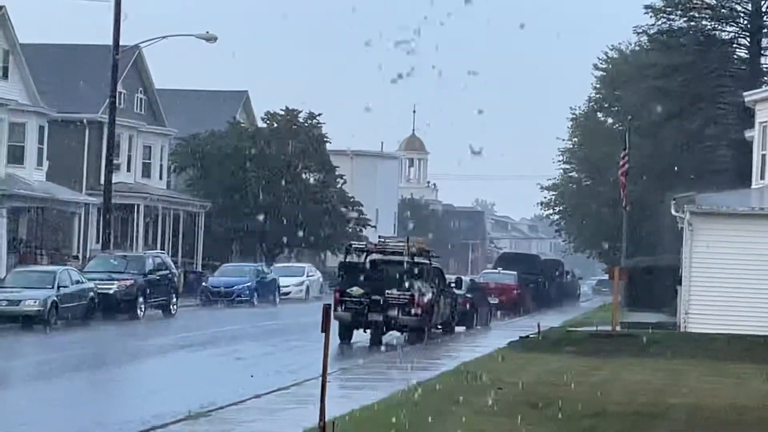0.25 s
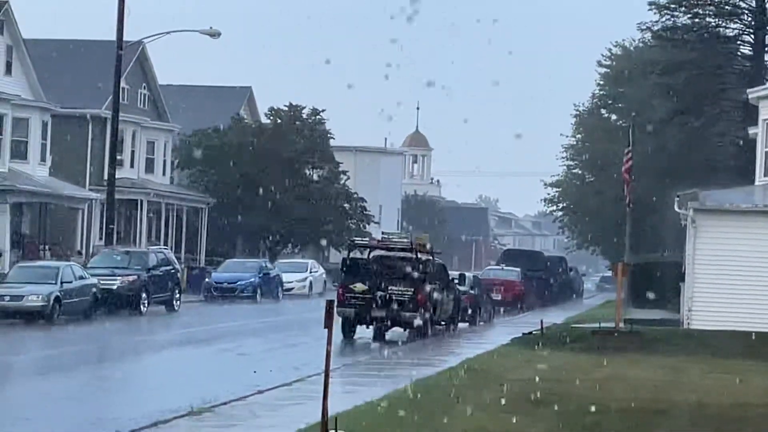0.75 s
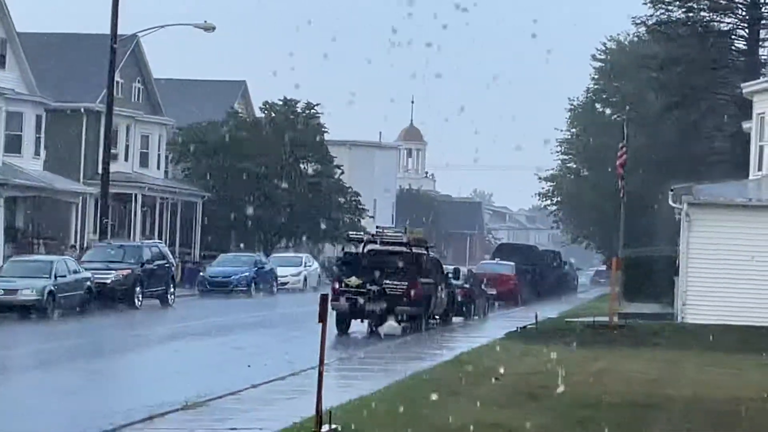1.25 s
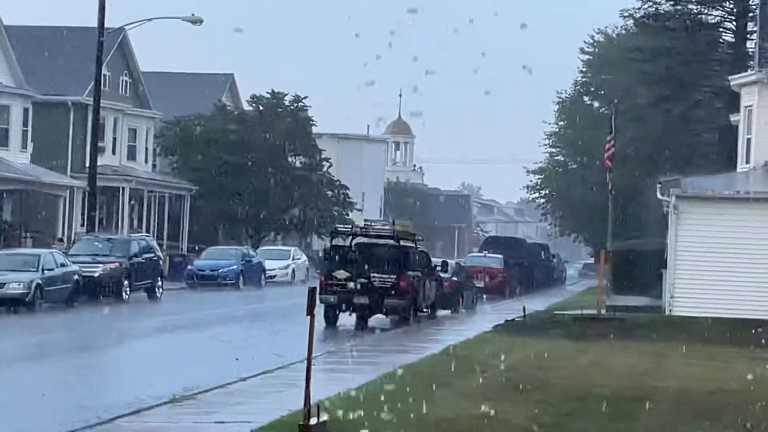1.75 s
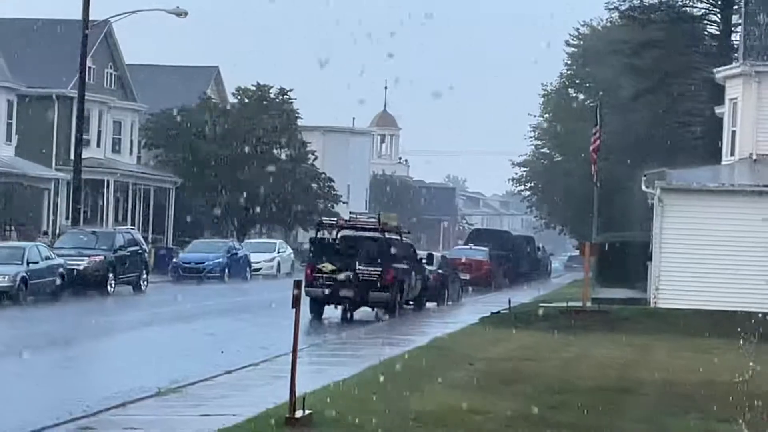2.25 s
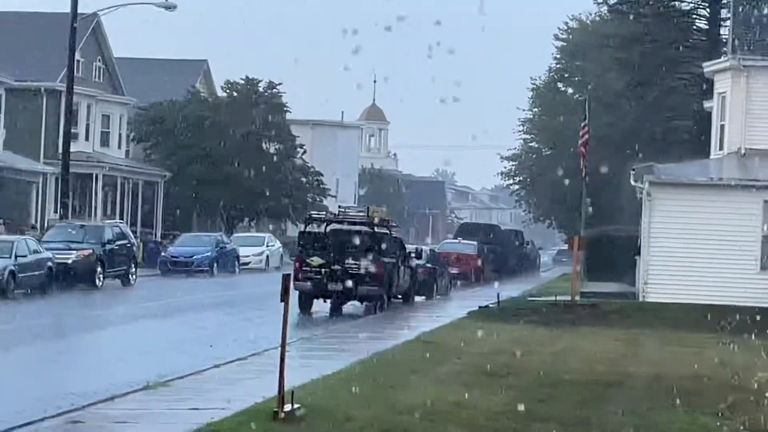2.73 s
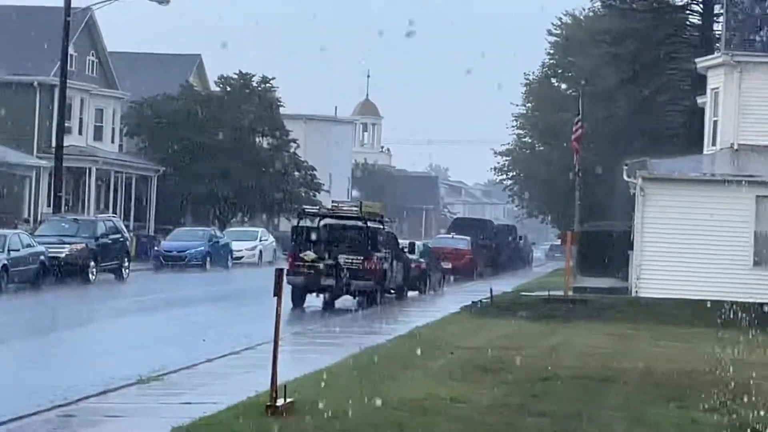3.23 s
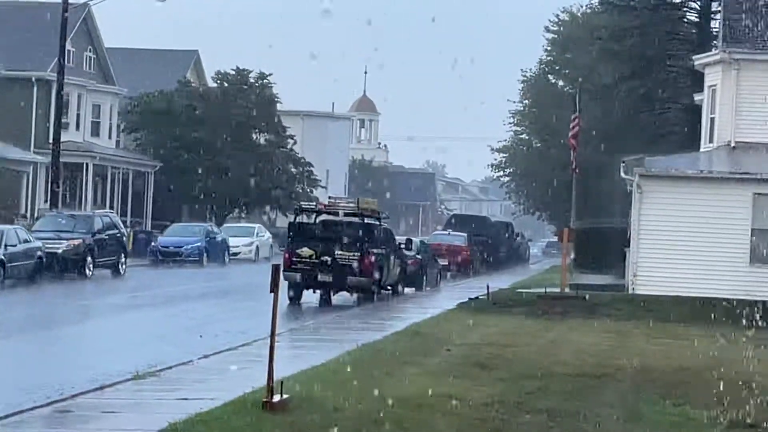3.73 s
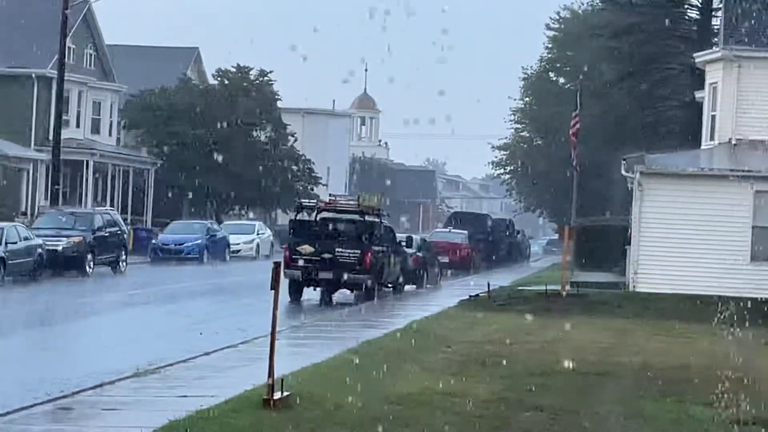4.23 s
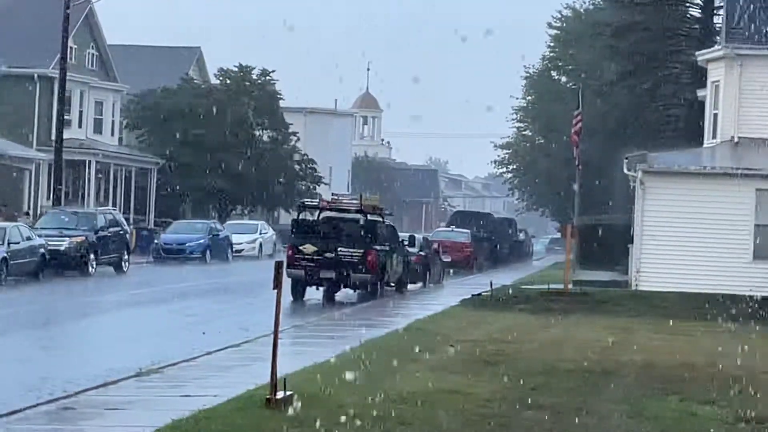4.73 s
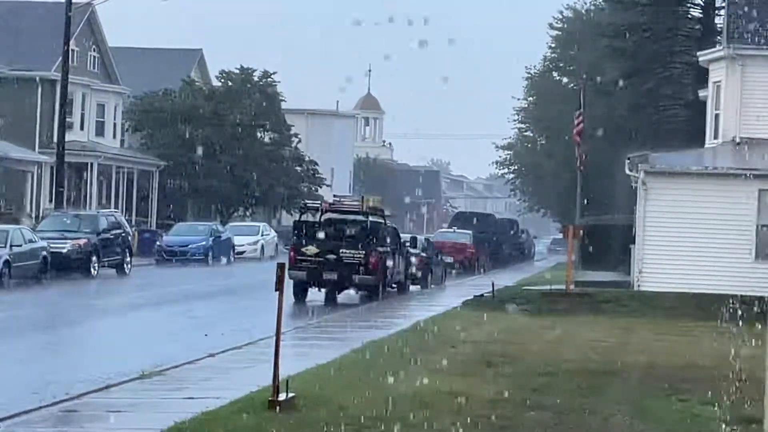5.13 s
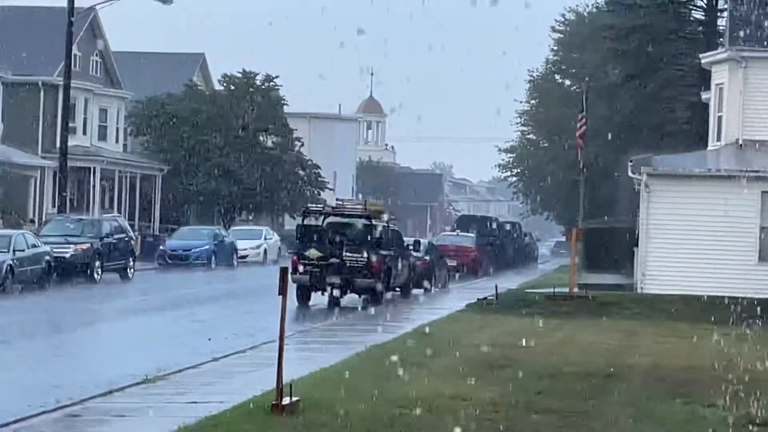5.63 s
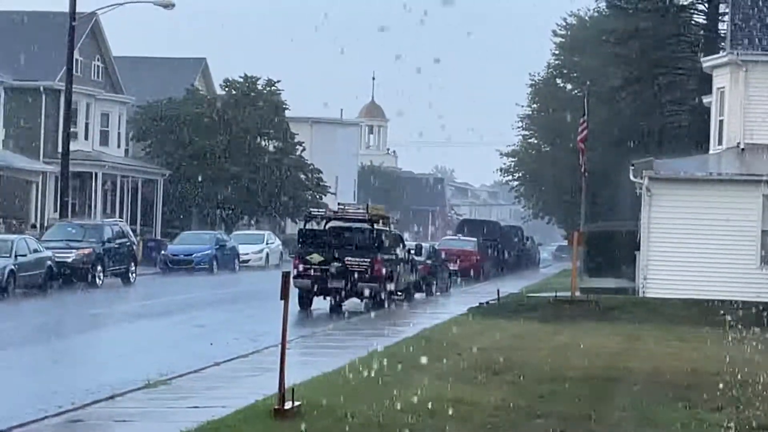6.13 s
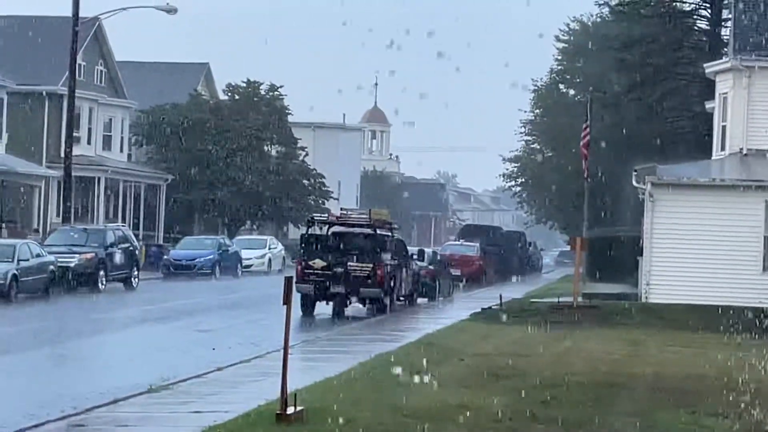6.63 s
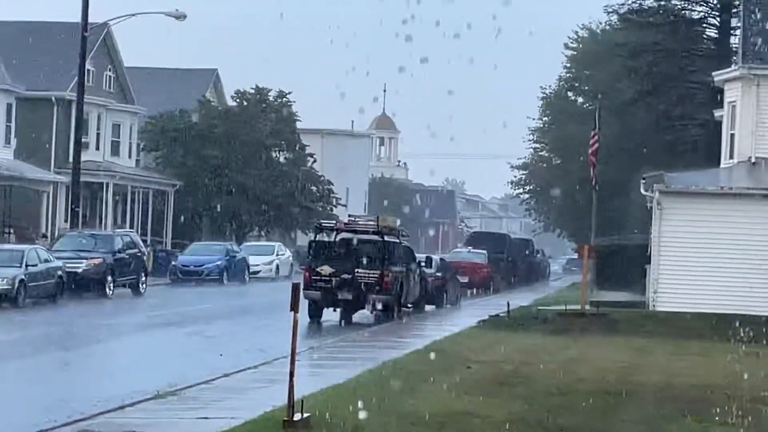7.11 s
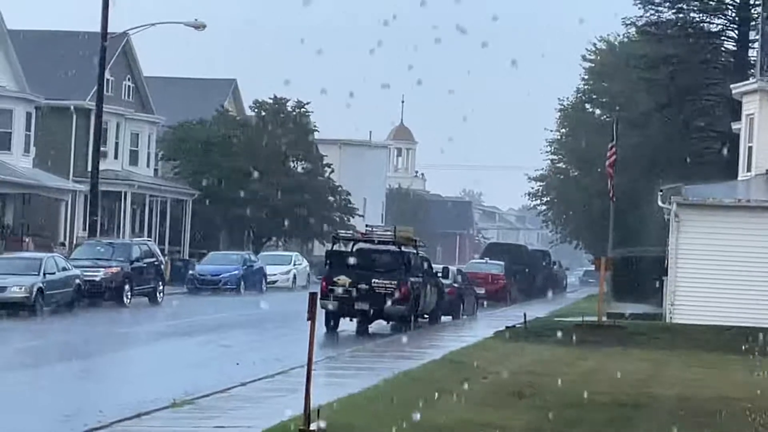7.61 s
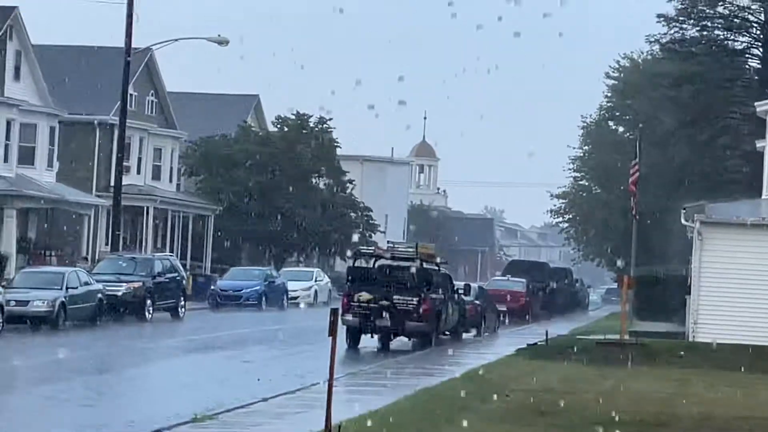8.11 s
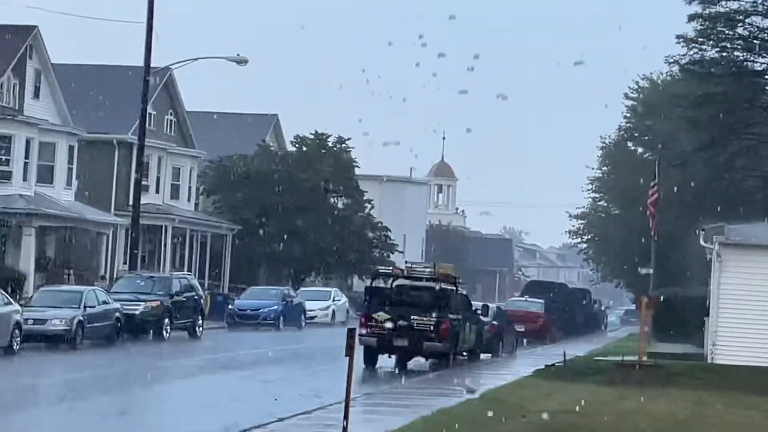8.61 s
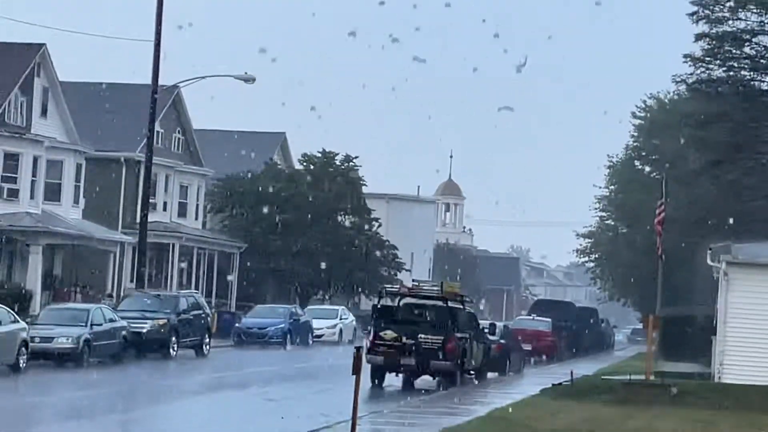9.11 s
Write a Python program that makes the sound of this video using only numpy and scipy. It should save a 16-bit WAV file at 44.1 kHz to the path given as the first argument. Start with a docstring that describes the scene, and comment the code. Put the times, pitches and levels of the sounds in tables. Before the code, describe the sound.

Heavy rain falls on a town street for the whole nine seconds or so, heard in stereo from a sheltered spot. Distant drops merge into an even hiss, nearer ones patter densely, and large close drops tick and smack irregularly on hard ground, with a very short reflection from house walls. A low rumble of far traffic lies underneath, slowly receding. From the start, a faint distant engine hums and climbs in pitch as it pulls away, dips with a gear change at about 4 seconds, rises a little again and fades by about 5.5 seconds. Soft low bumps and a dull knock come within the first 0.7 seconds, and another dull knock at about 7.4 seconds. The strongest close drops land around 2 and 3.4 seconds. The rain swells slightly near 5.6 seconds, then continues steadily to the end.

```python
"""Heavy rain on a town street, heard from shelter through two close microphone ports.
Countless far drops merge into a wash, nearer ones patter, and the nearest tick on hard ground,
each a smack with a brief ring. House walls scatter the nearer drops and a few dull knocks.
Far off, an engine's exhaust tones climb as it pulls away over the low rumble of the town."""
import sys
import numpy as np
from scipy import signal
from scipy.fft import rfft, irfft
from scipy.io import wavfile
from scipy.ndimage import uniform_filter1d

SR = 44100
rng = np.random.default_rng(int(sys.argv[2]) if len(sys.argv) > 2 else 0)


def wav_out(sig):
    """Save sig, one row per channel (or a flat mono array), as 16-bit PCM at SR to the path in sys.argv[1]."""
    wavfile.write(sys.argv[1], SR, np.round(np.clip(np.atleast_2d(sig).T, -1, 1) * 32767).astype(np.int16))


N = 412776
BAND_LIMIT_HZ = 15850
PRE_IMPACT_S = .006


def gain_of(db):
    """Decibels to amplitude."""
    return 10 ** (np.asarray(db) / 20)


def unit_rms(x):
    """Scales to rms 1."""
    return x / np.sqrt(np.mean(x ** 2) + 1e-20)


def at_hz(table, hz):
    """Interpolates a table over log frequency."""
    table_hz, value = np.transpose(table)
    return np.interp(np.log(hz + 1), np.log(table_hz + 1), value)


def add(mix, start_s, sound):
    """Mixes a sound in at start_s."""
    part = mix[max(round(start_s * SR), 0):][:len(sound)]
    part += sound[:len(part)]


# Likeness of far sound at the two ports: (frequency [Hz], coherence [0-1])
COHERENCE = [(50, 0.95), (130, 0.98), (260, 0.77), (500, 0.39), (900, 0.42), (1400, 0.23), (1800, 0.1),
             (2100, 0.56), (2600, 0.82), (3000, 1), (5300, 1), (6500, 1), (16000, 1)]
def diffuse(spectrum):
    """Noise from all around, partly alike at the two ports."""
    hz = np.fft.rfftfreq(N, 1 / SR)
    left, independent = rfft(rng.standard_normal((2, N)))
    coherence = np.clip(at_hz(COHERENCE, hz), 0, 1)
    right = coherence * left + np.sqrt(1 - coherence ** 2) * independent
    return irfft(np.array([left, right]) * gain_of(at_hz(spectrum, hz)) * np.sqrt(SR / 2), N)


# Far rain: (frequency [Hz], density [dB/Hz])
WASH_SPECTRUM = [(60, -90), (200, -73.5), (400, -69.5), (700, -70), (1200, -72.5), (1600, -72.5),
                 (1900, -71), (2400, -73.5), (3400, -78), (5300, -76.5), (8000, -77.5), (10000, -79.5),
                 (13000, -86.5), (15500, -82)]
def wash(patchy_db=1.98, flicker_db=0.7):
    """Far drops merge into a hiss that thickens and thins in patches."""
    hz, t, bands = signal.stft(diffuse(WASH_SPECTRUM), SR, nperseg=512)
    patches = uniform_filter1d(rng.standard_normal(bands.shape[1:]), size=5, axis=1)
    patches = unit_rms(uniform_filter1d(patches, size=9, axis=0))
    flicker = unit_rms(uniform_filter1d(rng.standard_normal(len(t)), size=7))
    nearness = np.clip(hz / 3500, 0.56, 1)[:, None]  # lows come from farther off: smoother
    level_db = nearness * (patchy_db * patches + flicker_db * flicker)
    return signal.istft(bands * gain_of(level_db), SR, nperseg=512)[1][:, :N]


def smack(low_hz, high_hz, crack_db, ground_hz=4000, ground_db=1.0, size=512):
    """One impact pulse: a broad band from hard ground plus a crack as the drop bursts."""
    hz = np.fft.rfftfreq(size, 1 / SR) + 1
    body = 1 / np.sqrt((1 + (low_hz / hz) ** 12) * (1 + (hz / high_hz) ** 12))
    body *= gain_of(ground_db * np.exp(-(2 * np.log2(hz / ground_hz)) ** 2))
    crack = gain_of(crack_db) / np.sqrt((1 + (4000 / hz) ** 4) * (1 + (hz / 10800) ** 10))
    pulse = np.fft.fftshift(np.fft.ifft(np.hypot(body, crack), size))
    return (pulse / abs(pulse).max() * np.exp(2j * np.pi * rng.random())).real


def drop(low_hz, high_hz, ring_hz, crack_db, echo_db, spray_db,
         ring_q=6.7, echo_s=.0024, droplets=5, droplet_gain=0.078, droplet_delay_s=.03):
    """A drop hits amid spray, flattens and rings; a rough surface echoes it and droplets fall."""
    lead, tail = round(PRE_IMPACT_S * SR), SR // 10
    t = np.arange(-lead, tail) / SR
    echo_at_s = echo_s * (1 + (2 * rng.random() - 1) / 10)
    blows = 1. * (t == 0)
    for db, peak_s, rise_s, decay_s in ((spray_db - 2, 0, .000285, .00057),  # flattening
                                        (spray_db, 0, .0017, .0057),  # spray
                                        (echo_db, echo_at_s, .000086, .00086)):
        age_s = t - peak_s
        envelope = np.exp(np.minimum(age_s / rise_s, -age_s / decay_s)) * (abs(t) > .0002)
        burst = rng.standard_normal(len(t)) * envelope
        blows += gain_of(db) * burst / np.linalg.norm(burst)
    landings = (rng.exponential(droplet_delay_s, droplets) * SR).astype(int) % tail
    blows[lead + landings] += droplet_gain * rng.standard_normal(droplets)
    tick = signal.fftconvolve(blows, smack(low_hz, high_hz, crack_db), "same")
    ring = signal.lfilter(*signal.iirpeak(min(ring_hz, BAND_LIMIT_HZ), ring_q, fs=SR), tick)
    return tick + ring


def patter(level_db=-35, drops_per_s=440, spread_db=5, largest_db=12.0, clumping=.5, spot_count=96):
    """Mid-distance drops land in clumps on many spots, each with its own colour; few are large."""
    spots = []
    for pitch, breadth, crack in rng.standard_normal((spot_count, 3)):
        low_hz = 3100 * np.exp(.35 * pitch)
        high_hz = low_hz * 1.98 * np.exp(0.27 * breadth)
        ring_hz = low_hz * (high_hz / low_hz) ** rng.random()
        spots.append(drop(low_hz, high_hz, ring_hz, crack_db=-7 + 3.5 * crack, echo_db=-10, spray_db=-8))
    density = np.exp(clumping * rng.standard_normal(N * 40 // SR))  # 25 ms slots
    fallen = np.r_[0, np.cumsum(density)]
    when, where, size = rng.random((int(drops_per_s * N / SR), 3)).T
    times_s = np.interp(when, fallen / fallen[-1], np.linspace(0, N / SR, len(fallen)))
    sizes_db = np.minimum(-spread_db * np.log(1 - size), largest_db)
    out = np.zeros(N)
    for time_s, spot, db in zip(times_s, (where * spot_count).astype(int), sizes_db):
        add(out, time_s, gain_of(db) * spots[spot])
    return gain_of(level_db) * out


def walls(x, wet_db=-12.0, t60_s=0.2, delay_s=.004):
    """House walls throw back a brief scatter."""
    t = np.arange(SR // 4) / SR
    tail = rng.standard_normal(len(t)) * gain_of(-60 * t / t60_s) * (t > delay_s)
    scatter = signal.oaconvolve(np.atleast_2d(x), tail[None] / np.linalg.norm(tail), axes=1)
    return x + gain_of(wet_db) * scatter[:, :N]


def rain_strength(level_db=-0.07, sway_db=0.22, gust_at_s=5.58, gust_width_s=0.37, gust_db=0.9):
    """The rain sways a little by chance and rises in one gust."""
    t = np.arange(N) / SR
    sway = sum(np.sin(2 * np.pi * (hz * t + rng.random())) for hz in np.geomspace(0.26, 1.262, 8))
    gust = np.exp(-((t - gust_at_s) / gust_width_s) ** 2)
    return gain_of(level_db + sway_db * unit_rms(sway) + gust_db * gust)


# Town rumble: (frequency [Hz], density [dB/Hz])
RUMBLE_SPECTRUM = [(10, -95), (22, -88), (32, -74), (45, -71), (60, -59.5), (76, -61.5), (92, -62.5),
                   (122, -65), (165, -66.5), (250, -68.5), (450, -78), (1200, -87.5), (4000, -130)]
# Far traffic swells: (time [s], half-width [s], centre [Hz], rise [dB])
TRAFFIC_SWELLS = [(.2, .45, 62, 3), (3.2, 0.67, 417, 7.5), (5.2, 0.81, 139.9, 1.5), (5.503, 0.14, 264, 6),
                  (6.005, 2.2, 245, 2)]
def traffic(start_db=0.42, fade_db_per_s=0.17, swell_octaves=0.27):
    """The town's low rumble slowly recedes, with a few swells of far traffic."""
    hz, t, bands = signal.stft(diffuse(RUMBLE_SPECTRUM), SR, nperseg=4096)
    level_db = start_db - fade_db_per_s * t
    for time_s, width_s, centre_hz, rise_db in TRAFFIC_SWELLS:
        band = np.exp(-(np.log2((hz + 1) / centre_hz) / swell_octaves) ** 2)
        swell = np.exp(-((t - time_s) / width_s) ** 2)
        level_db = level_db + rise_db * np.outer(band, swell)
    return signal.istft(bands * gain_of(level_db), SR, nperseg=4096)[1][:, :N]


# Pull, gear change, pull: (time [s], firing rate [Hz], firing tone [dB], octave [dB])
ENGINE_RUN = [(0, 50.86, -47, -50), (.7, 51.8, -43, -51), (1.0, 54.9, -46, -39.5), (1.22, 56.2, -56, -39),
              (1.4, 59.35, -45, -45), (1.6, 59.5, -43, -44.5), (1.85, 59.7, -45, -44.5),
              (2.0, 62.85, -43, -68), (2.3, 68.2, -43.5, -58), (2.6, 74.5, -50, -54.5),
              (3.08, 76, -44, -43), (3.32, 77.6, -49, -62), (3.7, 80, -59, -70), (4.15, 69.9, -54, -49),
              (4.45, 69.8, -49, -48.5), (4.85, 74.2, -50, -50.5), (5.45, 74.5, -64, -49)]
# Weaker exhaust tones: (order [x firing rate], level [dB re firing tone])
WEAK_ORDERS = [(1.5, -18.5), (5, -20)]
# Exhaust pipe resonances: (centre [Hz], width [Hz], boost [dB])
PIPE_MODES = [(108.6, 14, 16.5), (375, 13, 15)]
def engine(fade_s=0.2, flutter_db=2):
    """Far exhaust tones climb with speed; the weaker ones sing as they cross a pipe resonance."""
    t = np.arange(N) / SR
    times_s, *curves = np.transpose(ENGINE_RUN)
    firing_hz, firing_db, octave_db = (np.interp(t, times_s, curve) for curve in curves)
    phase = 2 * np.pi * np.cumsum(firing_hz) / SR
    tones = gain_of(firing_db) * np.sin(phase) + gain_of(octave_db) * np.sin(2 * phase)
    for order, db in WEAK_ORDERS:
        boost_db = sum(peak_db / (1 + (2 * (order * firing_hz - centre_hz) / width_hz) ** 2)
                       for centre_hz, width_hz, peak_db in PIPE_MODES)
        tones += gain_of(firing_db + db + boost_db) * np.sin(order * phase)
    uneven_firing = unit_rms(uniform_filter1d(rng.standard_normal(N), size=2500))
    fade = np.exp(-np.maximum(t - times_s[-1], 0) / fade_s)
    return np.sqrt(2) * tones * gain_of(flutter_db * uneven_firing) * fade


# Dull knocks and soft bumps: (time [s], level [dB], ring [Hz], decay [cycles])
KNOCK_HITS = [(.066, -27.5, 80, 1.6), (0.555, -25, 99, 2.3), (0.6668, -20.5, 1460, 2.5),
              (0.6675, -27, 1780, 6), (0.6714, -32, 1300, 6.5), (7.4306, -18, 970, 1.1),
              (7.4307, -28, 1970, 5), (7.4343, -27, 780, 1.8)]
def knocks():
    """Dull blows ring as quickly damped tones."""
    out, t = np.zeros(N), np.arange(SR // 8) / SR
    for time_s, db, hz, cycles in KNOCK_HITS:
        add(out, time_s, gain_of(db) * np.sin(2 * np.pi * hz * t) * np.exp(-hz * t / cycles))
    return out


def from_side(x, lead_s):
    """One sound at both ports, reaching the left lead_s sooner."""
    left = np.exp(1j * np.pi * np.fft.rfftfreq(len(x), 1 / SR) * lead_s)
    return irfft(rfft(x) * np.array([left, 1 / left]), len(x))


# Nearest drops: (time [s], level [dB], smack low edge [Hz], smack high edge [Hz], wet ring [Hz],
# crack [dB re smack], close echo [dB re direct])
NEAR_DROPS = [(0.2888, -23.5, 3700, 6000, 5400, -7, -4), (0.3001, -26.0, 2700, 11000, 9600, -24, -15),
              (0.3528, -29.5, 2300, 11000, 8400, -24, -12), (0.7254, -34, 1800, 4300, 2400, -18, -5),
              (1.0116, -26, 3700, 7000, 4000, -5, -17), (1.057, -30, 3700, 7000, 5200, -24, -8),
              (1.281, -27, 1600, 5000, 4200, -7, -9), (1.3365, -24, 2700, 6000, 4400, -18, -4),
              (1.5859, -29, 2700, 4000, 4000, -11, 0), (1.6196, -29.5, 2720, 5000, 4640, -7, -4),
              (1.7387, -27.5, 1599, 8450, 8400, -18, -1), (1.858, -33, 3200, 6400, 3500, -18, -6),
              (1.894, -18, 2080, 5700, 4830, -13, -12), (1.9647, -28.5, 1600, 6970, 2600, -24, 1),
              (1.9773, -31.5, 2300, 7000, 2400, -13, -3), (2.0683, -26, 1900, 8500, 4200, -24, 0),
              (2.0889, -19, 1910, 8540, 3600, -2, -15), (2.1041, -21.5, 1600, 8500, 4000, -7, -4),
              (2.1098, -31.5, 2710, 4500, 4200, -7, 1), (2.1288, -31.5, 1600, 5500, 2800, -9, -3),
              (2.2768, -27.5, 1600, 6000, 2610, -7, -2), (2.321, -31.5, 2300, 8560, 4200, -11, -15),
              (2.369, -31.5, 2700, 5500, 5400, -24, -10), (2.4456, -31.0, 2300, 8500, 2800, -13, -6),
              (2.5155, -26, 2700, 11000, 4200, -24, -12), (2.7084, -31, 1890, 6000, 5950, -18, -9),
              (2.8356, -29.5, 4000, 6800, 5600, -18, 0), (2.863, -26.5, 2300, 14000, 4400, -3, 2),
              (2.9438, -25.5, 1900, 4500, 2700, -18, -2), (2.9487, -26.5, 2700, 5500, 4000, -11, -6),
              (3.1741, -27.5, 3700, 5000, 5000, -4, -15), (3.2721, -30.5, 1910, 4510, 3210, -13, -4),
              (3.2982, -28, 2700, 7000, 3000, -4, 0), (3.3793, -28.0, 4300, 6000, 5600, -8, 0),
              (3.406, -20.5, 3700, 6000, 4900, -5, -21), (3.5713, -35, 10000, 15000, 11000, -12, -14),
              (3.6025, -32, 3700, 8500, 3800, -7, -15), (3.7104, -29, 5000, 7020, 5370, -3, -4),
              (3.8073, -28, 1900, 5500, 5200, -11, 3), (3.9116, -29.5, 4300, 14000, 10800, -11, 0),
              (4.0473, -28, 3690, 14000, 4000, -3, -2), (4.2908, -28.5, 3700, 8500, 4014, -5, -2),
              (4.3358, -29, 1900, 5000, 3000, -6, -10), (4.4777, -23, 2710, 7000, 5040, -18, -1),
              (4.5457, -28, 3700, 6000, 4400, -4, -4), (4.5582, -30, 3200, 4500, 4400, -5, -15),
              (4.6054, -29.5, 2300, 11000, 4600, -24, -13), (4.6263, -32, 2500, 5000, 4000, -18, -8),
              (4.8222, -23.5, 2700, 11000, 6800, -7, -15), (4.856, -27.5, 2300, 4010, 2397, -5, -4),
              (4.8832, -31, 1600, 4500, 2600, -5, 4), (4.9002, -29.5, 1600, 8500, 4600, -13, -15),
              (4.9301, -29.0, 3700, 14000, 5000, -3, -5), (4.9866, -31, 3700, 5000, 4800, -5, -10),
              (5.0488, -30, 1900, 4000, 2800, -11, -2), (5.0609, -27.0, 1600, 5540, 2600, -1, 3),
              (5.1685, -28, 3200, 8500, 8400, -18, -3), (5.1777, -29, 1900, 8500, 4200, -9, 0),
              (5.1853, -28, 1900, 11000, 2600, -24, -2), (5.2316, -28, 1900, 8500, 4000, -7, 2),
              (5.3103, -29, 1587, 8500, 3600, -13, -6), (5.4034, -26.5, 5060, 11000, 9800, -7, -9),
              (5.462, -32, 4300, 8500, 8400, -11, -1), (5.7152, -25.5, 3200, 14000, 4200, -3, -2),
              (5.7709, -27.5, 1910, 5500, 4000, -9, -6), (5.9383, -29.0, 4300, 6040, 6000, -9, -9),
              (5.9452, -29.5, 2300, 6000, 5400, -13, -5), (6.376, -29, 5000, 8500, 6800, -11, -7),
              (6.3933, -23.5, 1900, 14000, 10400, -24, 1), (6.4327, -31, 3200, 5500, 4200, -3, -11),
              (6.7543, -34, 3000, 4500, 3600, -18, -6), (6.7677, -29, 2700, 6000, 3000, -1, -8),
              (6.8108, -27.0, 2700, 8500, 8400, -9, -2), (6.9383, -23, 3500, 5600, 4700, -6, -6),
              (7.0153, -27.5, 2300, 11000, 10600, -24, 0), (7.1002, -30, 2300, 5500, 5400, -3, -4),
              (7.1052, -29.0, 3700, 7000, 5600, -11, -1), (7.206, -28.5, 1600, 8500, 8400, -13, 4),
              (7.2722, -29.0, 3700, 11000, 10800, -24, -3), (7.2992, -26, 1900, 6000, 5400, -4, -4),
              (7.3964, -24.0, 1900, 7000, 4200, -11, -11), (7.4249, -29.0, 1600, 7000, 3200, -11, -2),
              (7.4346, -29.0, 1600, 5000, 4000, -11, -1), (7.5121, -29, 3700, 11000, 4600, -24, 0),
              (7.5536, -31.5, 2700, 6000, 5200, -11, -5), (7.631, -32, 2300, 4500, 4200, -11, -15),
              (7.677, -25, 3700, 11000, 5200, -24, -14), (7.776, -24.5, 1900, 4800, 2800, -4, -14),
              (7.8749, -34, 3300, 6300, 3700, -18, -6), (7.9314, -32, 1600, 5000, 2420, -18, -3),
              (8.0482, -29.5, 3200, 5000, 4800, -4, -15), (8.1779, -33, 2300, 6000, 5600, -11, -3),
              (8.2667, -32.5, 2300, 4500, 4000, -7, -5), (8.275, -27.5, 1600, 6000, 5800, -1, -2),
              (8.3353, -28.5, 1800, 4300, 2500, -12, -1), (8.4285, -35, 3700, 8500, 4400, -11, -5),
              (8.5363, -34, 3700, 5000, 4200, -7, -15), (8.5453, -32, 3700, 11000, 5400, -24, -3),
              (8.586, -31.0, 2300, 5000, 4800, -16, -9), (8.6006, -32.0, 3700, 5000, 4400, -7, -15),
              (8.6696, -29, 2300, 7000, 4000, -24, -15), (8.7373, -26, 2300, 6000, 3600, -3, -14),
              (8.7932, -36, 4300, 6000, 5000, -7, -15), (8.8021, -28.5, 4200, 6000, 5400, -15, -3),
              (8.9115, -27, 4300, 7000, 5600, -1, -1), (8.9446, -30.0, 5000, 8500, 8400, -7, -10),
              (9.025, -26.5, 2400, 4800, 3900, -16, -18), (9.2005, -30, 1900, 4000, 4000, -1, -9),
              (9.2983, -32.5, 5020, 6930, 6200, -9, -3)]
def near_drops(trim_db=-0.47, impact_s=.005, close_db=-20, lead_spread_s=6e-6):
    """Large drops tick close by, each from its own side; fainter ones are farther and more smeared."""
    out = np.zeros((2, N))
    for time_s, db, *colour in NEAR_DROPS:
        tick = drop(*colour, spray_db=-6 + 0.27 * (close_db - db))
        tick *= gain_of(db + trim_db) * np.sqrt(impact_s * SR / np.sum(tick ** 2))
        for port, heard in zip(out, from_side(tick, lead_spread_s * rng.standard_normal())):
            add(port, time_s - PRE_IMPACT_S, heard)
    return out


def scene():
    """Rain near and far over the sounds of the town."""
    rain = (wash() + walls(patter())) * rain_strength()
    return rain + traffic() + engine() + walls(knocks() + near_drops())


# Left port's phase lead: (frequency [Hz], lead [rad])
LEFT_LEAD = [(50, 0), (200, .15), (450, .6), (800, 1), (1100, .4), (1400, -.25), (2000, 0), (2500, .2),
             (3100, 0), (6100, -.05), (7000, -.9), (7800, -2.9), (8700, -3.35), (9600, -4.6), (10600, -6.1),
             (12200, -6.35), (13100, -7.5), (14000, -9.2), (16000, -9.55)]
# Port balance: (frequency [Hz], left minus right [dB])
LEFT_BALANCE = [(40, 0), (160, -3), (330, -1), (600, 1.5), (1000, 0.5), (1450, -0.5), (1850, 3), (2300, 1)]
def record(dry, centred_above_hz=3000):
    """The two ports differ in phase and, below the treble, in level; a low-pass limits the band."""
    hz = np.fft.rfftfreq(N, 1 / SR)
    balance_db = at_hz(LEFT_BALANCE, hz) * (hz < centred_above_hz)
    left = gain_of(balance_db / 2) * np.exp(1j * at_hz(LEFT_LEAD, hz) / 2)
    ports = irfft(rfft(dry) * np.array([left, 1 / left]), N)
    lowpass = signal.firwin(511, BAND_LIMIT_HZ, window=("kaiser", 9), fs=SR)
    return signal.oaconvolve(ports, lowpass[None], "same")


dry = scene()
out = record(dry)
wav_out(out)
```